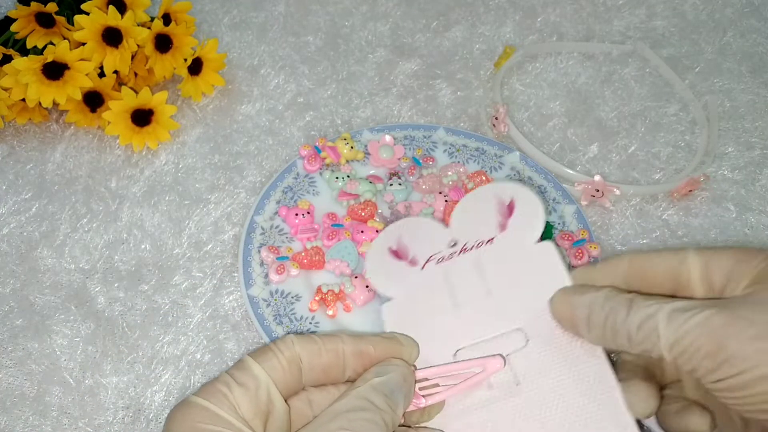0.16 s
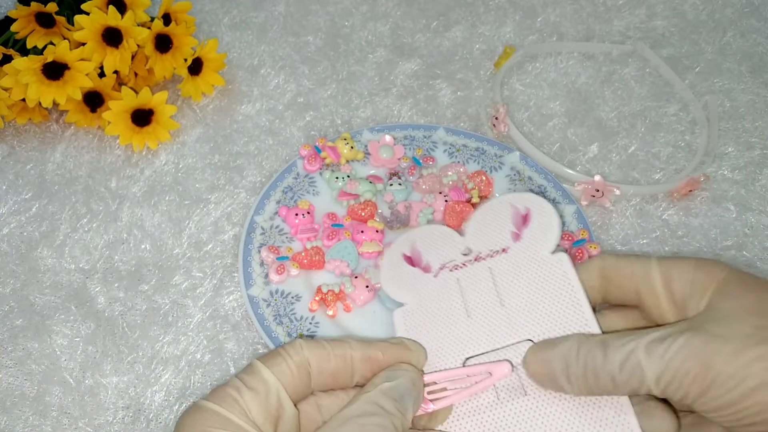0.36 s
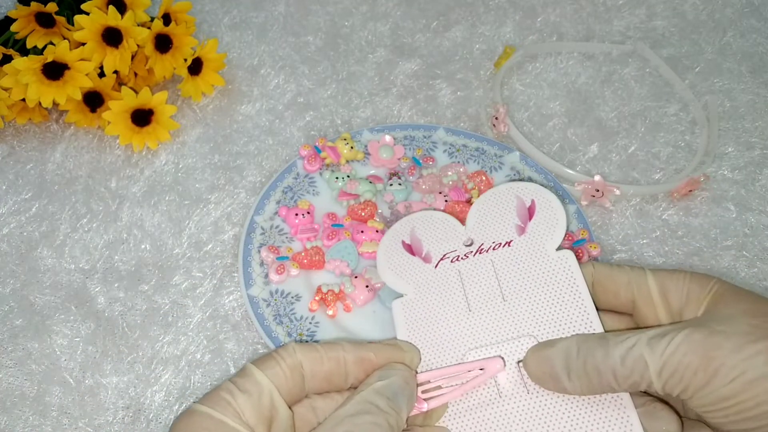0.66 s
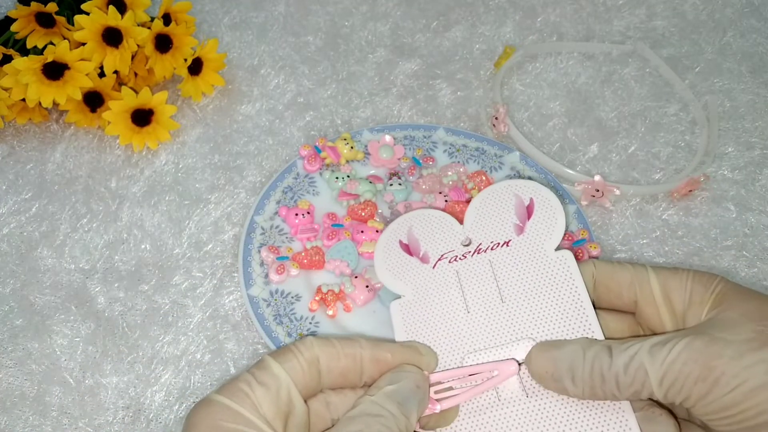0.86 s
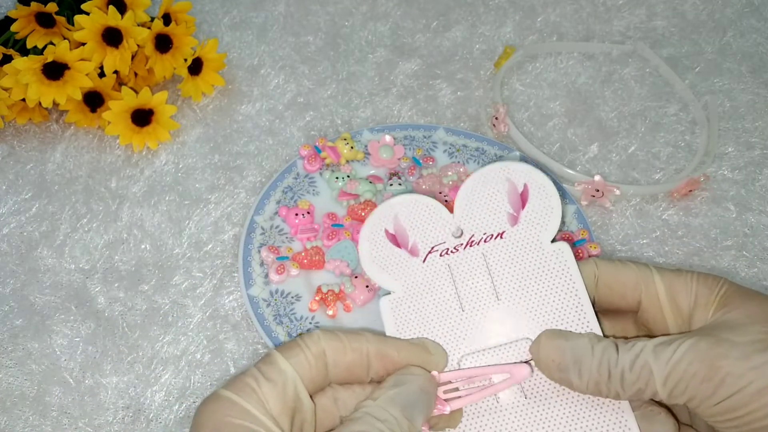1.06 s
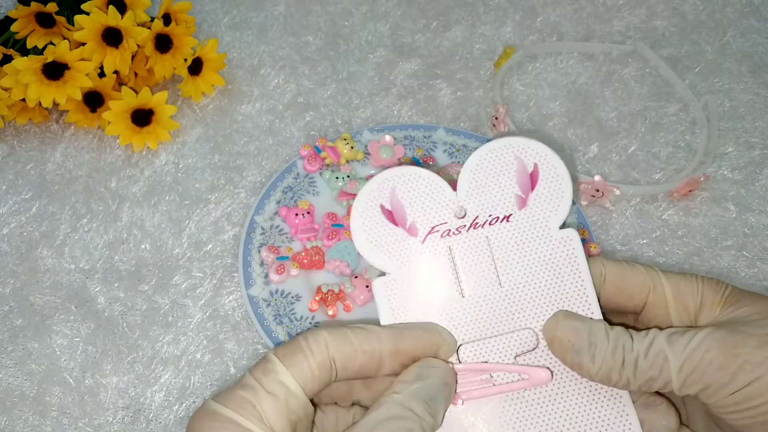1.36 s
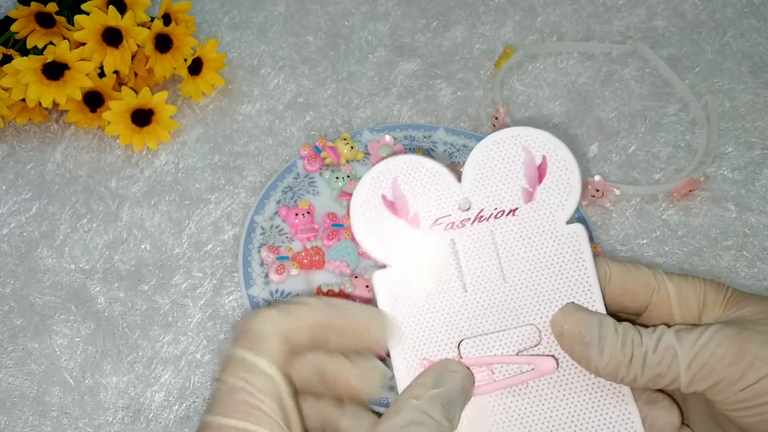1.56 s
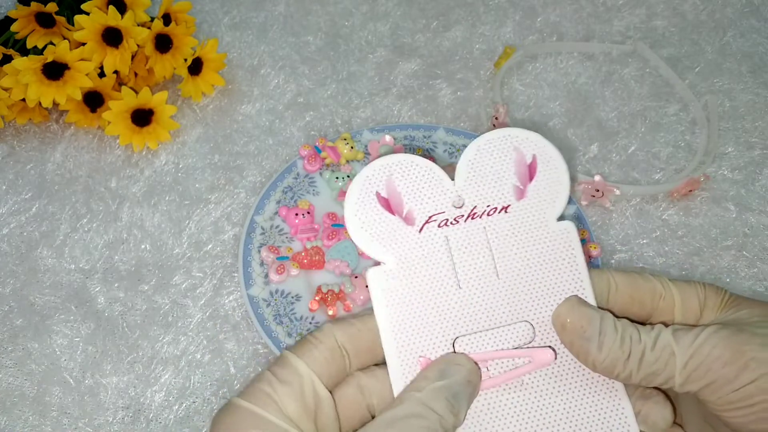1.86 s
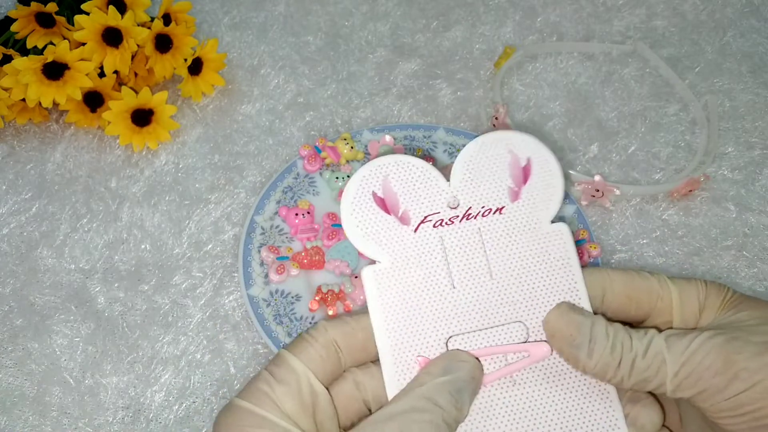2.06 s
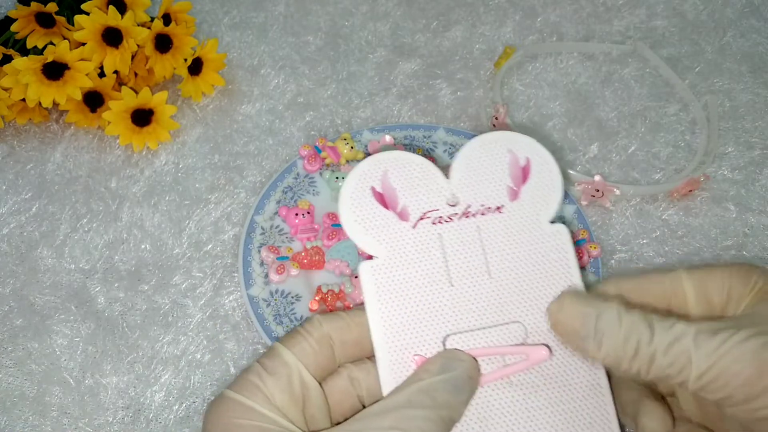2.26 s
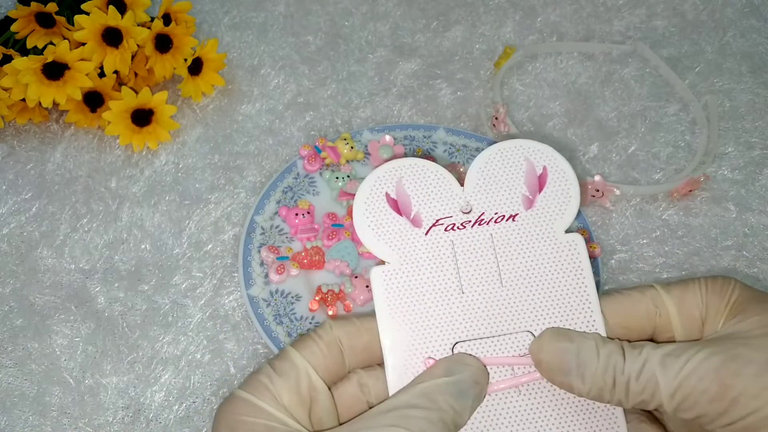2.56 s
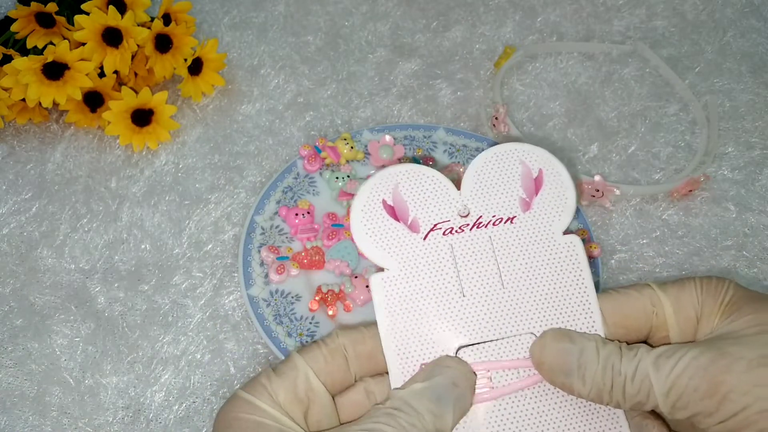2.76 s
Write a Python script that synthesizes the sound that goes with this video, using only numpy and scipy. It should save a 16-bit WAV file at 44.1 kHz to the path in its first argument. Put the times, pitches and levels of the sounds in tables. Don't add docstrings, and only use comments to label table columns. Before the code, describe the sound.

A plastic hair clip is fitted onto a stiff card, heard close in stereo. Faint glove brushes lead to a crisp click at 0.5 s, with light ticks near 1.1 and 1.25 s. A quick crackle of ticks and scrapes comes at 1.5-1.6 s, a dull knock at 2.1 s, small squeaks near 2.2 s, and the loudest, short snap at 2.73 s. Quiet room rumble and faint hum continue.

```python
import sys
import numpy as np
from scipy import signal
from scipy.fft import rfft, irfft, next_fast_len
from scipy.io import wavfile
from scipy.ndimage import uniform_filter1d

SR = 44100
rng = np.random.default_rng(int(sys.argv[2]) if len(sys.argv) > 2 else 0)


def ratio_of_db(decibels):
    return 10 ** (np.asarray(decibels, float) / 20)


def to_wav(s):
    ch = np.atleast_2d(s).T
    pcm = np.round(np.clip(ch, -1, 1) * 32767)
    wavfile.write(sys.argv[1], SR, pcm.astype(np.int16))


N = 127890


TICKS = [(0.059, -52, 1540, -14), (0.1222, -62, 2300, 7), (0.1426, -55.5, 1500, -11),
         (0.3217, -72, 2500, -11), (0.4928, -38, 2470, -5.5), (0.7195, -62.5, 1190, -26),
         (0.9009, -62, 860, -4), (0.9242, -52, 3840, -5), (1.036, -59.5, 1100, -48),
         (1.077, -50, 2920, -22), (1.2392, -51.5, 1210, -14), (1.2868, -55, 1280, -21),
         (1.3592, -60.5, 3190, -9), (1.5117, -45, 1940, -16), (1.5192, -36, 1960, 10),
         (1.5346, -46, 1430, 2), (1.546, -36.5, 3400, 3), (1.5644, -42, 1860, 0),
         (1.5804, -54, 3180, -15), (1.5882, -52, 3450, -8), (2.0072, -59, 1080, -23),
         (2.0976, -37.5, 1220, -44), (2.1332, -46, 1440, -11), (2.231, -55, 1710, -18),
         (2.7452, -36, 1340, -2), (2.7492, -40, 5000, 7),
         (0.4926, -42.5, 3930, 11), (1.2756, -38, 3300, 9.5), (1.499, -52, 1130, -11),
         (1.5496, -34, 4960, -6.5), (2.0981, -40, 2030, -9), (2.0992, -44.5, 6100, -17),
         (2.1840, -50, 2040, -10), (2.2400, -51, 1640, -21.5), (2.7295, -38, 4270, -5),
         (2.8975, -50.5, 940, -14)]


def tick(start_s, peak_db, ring_hz, treble_db):
    t = np.arange(600) / SR
    snap = ratio_of_db(-60 * t / 0.0085) * np.minimum(t / 0.0008 + 0.1, 1)
    splinters = ratio_of_db(-24 - 60 * t / 0.04) * np.minimum(t / 0.001, 1)
    blow = spread(600) * (snap + splinters)
    x = colour(blow, body_db(ring_hz, treble_db / 3, ring_db=11, sharp=7.0))
    return start_s, ratio_of_db(peak_db) * x / abs(x.mean(0)).max()


# start_s, peak_db, pitch_hz, t60_s
MODE_PINGS = [(0.494, -36.5, 2410, 0.012), (0.494, -40, 3800, 0.011), (.4932, -54, 9100, 0.005),
              (.4935, -40.5, 605, 0.015), (.4930, -46, 4900, 0.012), (.4938, -51.5, 843, 0.022),
              (1.0372, -64, 1090, 0.032), (1.0776, -50.5, 3920, 0.0069), (1.078, -51.5, 1450, 0.0091),
              (1.0772, -50, 2400, 0.013), (1.2760, -48, 3340, 0.0062), (1.274, -54, 1970, 0.018),
              (1.2762, -43, 9360, 0.011), (1.2760, -45, 1220, .015), (1.2761, -50.5, 5800, 0.019),
              (1.2760, -62, 14500, .005), (1.3590, -65, 3110, 0.026), (1.5130, -45, 1930, .015),
              (1.5195, -43, 8560, 0.014), (1.5206, -40.5, 1940, .025), (1.5466, -47, 3360, .03),
              (1.5490, -43, 4800, .02), (1.5500, -34.5, 3390, 0.022), (1.549, -43, 8100, 0.017),
              (1.5640, -49, 1916, 0.03), (1.566, -43, 3300, 0.024), (1.569, -48, 427, 0.093),
              (1.559, -51, 198, 0.098), (1.5800, -55, 4820, 0.014), (1.58, -47, 8040, .02),
              (1.5885, -54, 7860, .015), (2.0986, -38.5, 303, .06), (2.0982, -49, 1270, 0.042),
              (2.0985, -43, 1940, 0.018), (2.0989, -38.5, 5440, 0.0088), (2.1339, -47, 1370, 0.014),
              (2.1843, -41, 2050, 0.0096), (2.1860, -67, 805, 0.11), (2.7303, -29, 970, 0.021),
              (2.7317, -29.5, 490, 0.0064), (2.757, -47, 103, 0.061), (2.73, -40.5, 4500, 0.0071),
              (2.7306, -41.5, 2750, 0.017), (2.7299, -40.5, 3500, .014), (2.7300, -56, 5800, .009),
              (2.7305, -50, 2020, 0.017), (2.7467, -39, 1406, 0.021), (2.7493, -35, 5920, 0.0041),
              (2.7518, -35.5, 870, 0.014), (2.754, -49, 4270, .03)]


def ping(start_s, peak_db, pitch_hz, t60_s):
    t = np.arange(4000) / SR
    lag = 1.5 * min(pitch_hz / 3000, 1) ** 2
    phase = lag / 2 * np.array([[-1], [1]])
    ring = np.sin(2 * np.pi * pitch_hz * t + phase)
    return start_s, ratio_of_db(peak_db - 60 * t / t60_s) * ring * np.minimum(t / 0.00042, 1)


# start_s, length_s, rms_db, ring_hz, treble_db
SCRAPES = [(0.498, 0.045, -58, 2460, -0.5), (1.074, 0.021, -64.5, 2280, -5.5),
           (1.242, 0.045, -64, 3670, 2.5), (1.278, 0.021, -65.5, 2150, -16.5),
           (1.492, 0.035, -53.5, 1010, -3.5), (1.516, 0.023, -56, 1890, -7), (1.537, 0.058, -51.5, 4900, 0),
           (1.589, 0.0208, -61.5, 3550, 1.5), (2.102, 0.043, -64, 6000, 0.5), (2.189, 0.036, -64, 3950, -4),
           (2.228, 0.0363, -65, 2400, -5), (2.738, 0.0073, -50, 1500, -12), (2.746, 0.028, -52, 1140, -5.5),
           (2.77, 0.019, -61, 2860, -3), (2.785, 0.016, -63.5, 2540, -25)]
# start_s, length_s, rms_db, ring_hz, treble_db
GLOVE_BRUSHES = [(.0, 0.066, -71.5, 1120, -9), (0.046, 0.037, -67.5, 1480, 1.5),
                 (0.105, 0.031, -64, 1120, -4), (.135, 0.054, -76, 1410, -6),
                 (0.307, 0.03, -65, 2410, -3.5), (0.328, 0.14, -71.5, 2590, -24.5),
                 (0.528, 0.054, -70, 2500, -38), (0.847, 0.12, -78, 2980, -3),
                 (0.915, 0.027, -62, 2760, -2.5), (1.099, 0.27, -80, 3600, 3),
                 (1.194, 0.1, -73.5, 3420, -8), (1.278, 0.045, -99, 8600, -25),
                 (1.374, 0.05, -73.5, 8800, 1.5), (1.433, 0.38, -67.5, 2960, 2),
                 (1.624, 0.23, -86, 3070, 10), (1.861, 0.084, -77, 1740, -8), (2.048, 0.13, -75, 2760, 2.5),
                 (2.254, .12, -81.5, 1580, -7), (2.655, 0.14, -83, 3520, 7), (2.789, 0.054, -70, 3000, -29)]


def rub(start_s, length_s, rms_db, ring_hz, treble_db, soft):
    slips = rng.standard_normal(6000)
    t = np.arange(min(round(length_s * SR), 6000)) / SR
    unevenness_db = 2.0 * evened(uniform_filter1d(slips, size=70)) + 1.5 * slips
    grit = spread(6000) * ratio_of_db(unevenness_db)
    if soft:
        shape = np.sin(np.pi * t / length_s) ** 0.88
    else:
        shape = np.clip(np.minimum(t / 0.0018, (length_s - t) / 0.0011), 0, 1)
    x = colour(grit[:, :len(t)] * shape, body_db(ring_hz, treble_db / 2, ring_db=5.5, sharp=22.0))
    return start_s, ratio_of_db(rms_db) * x / np.sqrt(np.sum(x ** 2) / len(t) / 2)


# start_s, length_s, rms_db, pitch_hz, overtone_fall_db (per step)
SQUEALS = [
    (.505, .016, -59, 2400, -16),
    (.521, .022, -67, 2450, -14),
    (1.247, .027, -66, 3400, -14),
    (1.285, .030, -77, 8550, -20),
    (2.185, .034, -62, 1550, -2.5),
    (2.230, .033, -59, 1620, -13),
    (2.774, .011, -63, 2850, -14),
]


def squeal(start_s, length_s, rms_db, pitch_hz, overtone_fall_db):
    chance = spread(2000)
    t = np.arange(min(round(length_s * SR), 2000)) / SR
    x = np.zeros((2, 2000))
    for k in range(6):
        if k * pitch_hz < 5500:
            hz, width_hz = (k + 1) * pitch_hz, 78 * (k + 2)
            band = resonate(resonate(chance, hz, width_hz), hz, width_hz)
            x += ratio_of_db(overtone_fall_db * k) * band
    x = x[:, -len(t):]
    shape = np.clip(np.minimum(t / 0.0009, (length_s - t) / 0.0052), 0, 1)
    return start_s, ratio_of_db(rms_db) * evened(x) * shape


# ratio (to lowest_hz), level_db
CARD_MODES = [(1.004, 15.5), (1.33, 9), (1.95, 9), (3.0, -48)]
# start_s, peak_db, lowest_hz, t60_s, upper_db (shifts all modes above ratio 1 alike, before
KNOCKS = [
    (.4930, -43.5, 396, 0.025, 0),
    (1.239, -50.5, 480, 0.044, 0),
    (1.503, -41, 326, 0.071, 0),
    (2.0981, -33, 225.7, 0.1, -12),
    (2.7297, -28.5, 488, 0.016, -20),
    (2.745, -42, 400, 0.14, 0),
    (2.761, -34.5, 187, 0.0098, -4),
]


def knock(start_s, peak_db, lowest_hz, t60_s, upper_db):
    t = np.arange(6000) / SR
    x = np.zeros(6000)
    for ratio, level_db in CARD_MODES:
        decay_db = -60 * t * ratio ** 0.33 / t60_s
        mode_db = level_db + upper_db * (ratio > 1) + decay_db
        x += ratio_of_db(mode_db) * np.sin(2 * np.pi * lowest_hz * ratio * t)
    return start_s, ratio_of_db(peak_db) * x / abs(x).max() * np.minimum(t / 0.00042, 1)


# freq_hz, level_db (per Hz)
BODY = [(200, -33), (400, 1.5), (900, -6.5), (1900, -8.5), (3400, -10), (6600, -12.5), (8800, -14.5),
        (15500, -45.5)]


def body_db(ring_hz, treble_db, ring_db, sharp):
    hz = np.fft.rfftfreq(2048, 1 / SR)
    ring = ring_db / (1 + ((hz - ring_hz) * sharp / ring_hz) ** 2)
    bass_loss = 3.0 * np.maximum(np.log2(min(ring_hz, 2500) / (hz + 50)), 0)
    notch = 9 / (1 + ((hz - 6750) / 350) ** 2)
    tilt = treble_db * np.log2((hz + 300) / 3000)
    return read(BODY, hz) + ring - bass_loss - notch + tilt


def spread(size):
    z = rng.standard_normal((3, size))
    late = rng.integers(1, 6)
    treble = signal.butter(2, 1700, "high", fs=SR, output="sos")
    own = 0.8 * signal.sosfilt(treble, z[:2])
    return np.array([np.roll(z[2], late), z[2]]) + own


def walls(x):
    at = np.arange(200, 8800, 20) + rng.integers(0, 20, (2, 430))
    taps = np.zeros((2, 8900))
    np.put_along_axis(taps, at, rng.choice([-1., 1.], at.shape), 1)
    taps *= ratio_of_db(-60 * np.arange(8900) / SR / 0.19)
    return signal.fftconvolve(x, taps / np.linalg.norm(taps[0]), axes=1)[:, :N]


# freq_hz, level_db (per Hz)
ROOM_TONE = [(4, 5), (28, -2), (62, -3), (85, -10.5), (300, -20), (600, -28.5), (1300, -45.5), (16000, -62)]
# freq_hz, likeness (0 to 1)
LIKENESS = [(5, 1), (60, 0.45), (300, 0.49), (1400, 0.036), (5000, 0.007)]
# freq_hz, left_minus_right_db
BALANCE = [(5, -19.5), (25, -15), (60, -4), (150, -4.5), (500, -2.5), (3000, -1.5)]
# start_s, level_db
FAR_HUM = [(0, -81.5), (.3, -58.5), (.95, -61), (1.1, -71), (1.6, -68.5), (2.0, -65.5), (2.2, -67.5),
           (2.9, -69)]


def room_tone():
    size = next_fast_len(N + 4096)
    t = np.arange(size) / SR
    hz = np.fft.rfftfreq(size, 1 / SR)
    a, b = rfft(rng.standard_normal((2, size)))
    same = np.clip(read(LIKENESS, hz), 0, 1)
    pair = np.array([a, same * a + np.sqrt(1 - same ** 2) * b])
    air = ratio_of_db(-51.5) * evened(irfft(pair * ratio_of_db(read(ROOM_TONE, hz)), size))
    drift = uniform_filter1d(rng.standard_normal(size), size=3000)
    air *= ratio_of_db(2.23 * evened(uniform_filter1d(drift, size=3000)))
    noise = irfft(pair, size)

    drone_hz, drone_width_hz = 53, 22
    drone = resonate(resonate(noise, drone_hz, drone_width_hz), drone_hz, drone_width_hz)
    drone = ratio_of_db(-65) * evened(drone)

    hum_hz, hum_width_hz = 109.06, 5.6
    waver = 0.37 * evened(resonate(noise[0], hum_hz, hum_width_hz))
    start_s, level_db = np.transpose(FAR_HUM)
    hum = evened(np.sin(2 * np.pi * hum_hz * t) + waver) * ratio_of_db(np.interp(t, start_s, level_db))

    lean = ratio_of_db(read(BALANCE, hz) / 2 * np.array([[1], [-1]]))
    return irfft(rfft(air + drone + hum) * lean, size)[:, :N]


def sway():
    x = rng.standard_normal((2, N + SR))
    band = signal.butter(2, [2., 9], "band", fs=SR, output="sos")
    x = signal.sosfiltfilt(band, x)[:, SR // 2:SR // 2 + N]
    return ratio_of_db(-47) * evened(x) * ratio_of_db(np.array([[-12.], [0]]))


def evened(x):
    return x / np.sqrt(np.mean(x ** 2) + 1e-20)


def read(points, hz):
    f, value = np.transpose(points)
    return np.interp(np.log(hz + 1), np.log(f + 1), value)


def resonate(x, hz, width_hz):
    turn = np.exp(2j * np.pi * hz * np.arange(x.shape[-1]) / SR)
    r = np.exp(-np.pi * abs(width_hz) / SR)
    return 2 * (turn * signal.lfilter([1 - r], [1, -r], x / turn)).real


def colour(x, db):
    log = np.log(ratio_of_db(np.concatenate([db, db[-2:0:-1]])))
    taps = np.fft.ifft(np.exp(np.conj(signal.hilbert(log)))).real[:1024]
    return signal.oaconvolve(x, taps[None], axes=1)


def add(mix, start_s, sound):
    part = mix[:, round(start_s * SR):][:, :sound.shape[-1]]
    part += sound[..., :part.shape[1]]


def scene():
    hands = np.zeros((2, N))
    for row in TICKS:
        add(hands, *tick(*row))
    for row in MODE_PINGS:
        add(hands, *ping(*row))
    for row in SCRAPES:
        add(hands, *rub(*row, soft=False))
    for row in GLOVE_BRUSHES:
        add(hands, *rub(*row, soft=True))
    for row in SQUEALS:
        add(hands, *squeal(*row))
    for row in KNOCKS:
        add(hands, *knock(*row))
    direct = hands * ratio_of_db(np.array([[-0.6], [0.6]]))
    return direct + ratio_of_db(-19.0) * walls(hands) + room_tone() + sway()


def band_limit(x):
    return signal.sosfilt(signal.butter(12, 16380, fs=SR, output="sos"), x)


def record(dry):
    low_pass = signal.firwin(511, 16300, window=("kaiser", 9), fs=SR)
    x = signal.oaconvolve(dry, low_pass[None], "same")
    x = x * np.minimum(np.arange(N) / SR / 0.004, 1)
    return band_limit(x)


dry = scene()
out = record(dry)
to_wav(out)
```